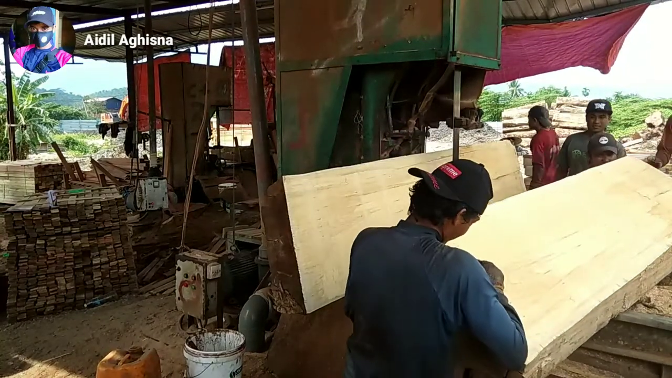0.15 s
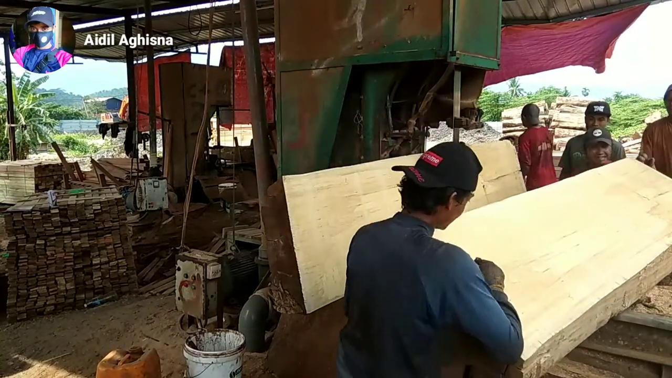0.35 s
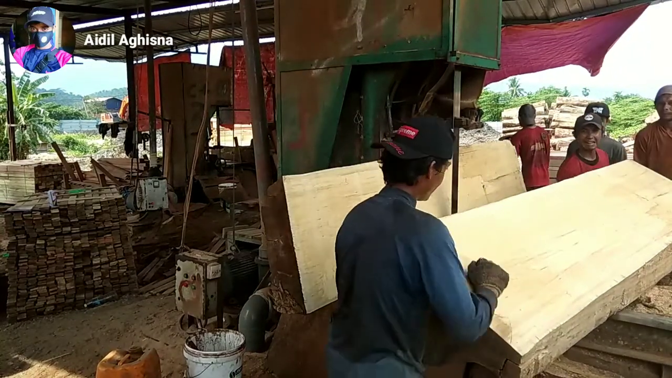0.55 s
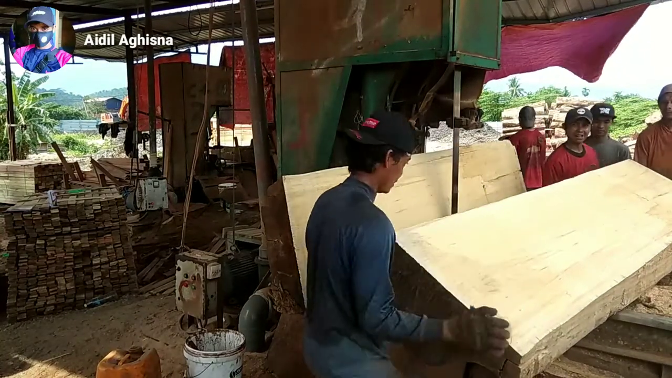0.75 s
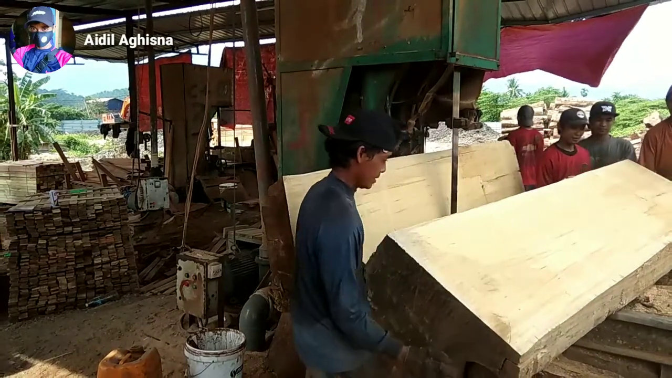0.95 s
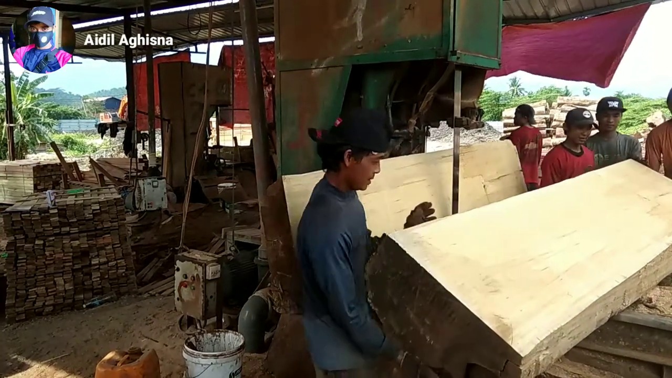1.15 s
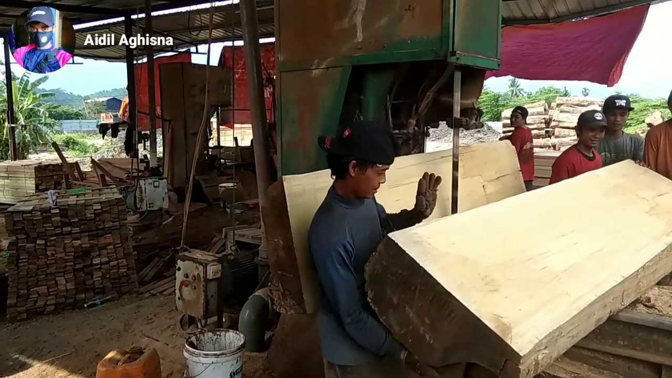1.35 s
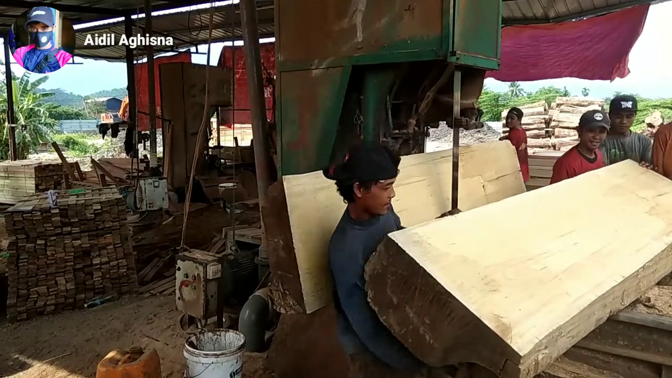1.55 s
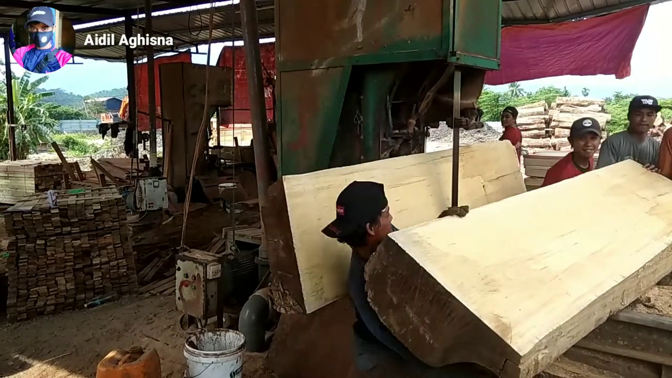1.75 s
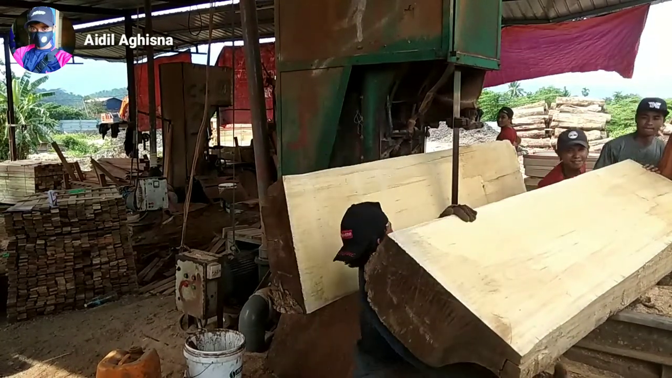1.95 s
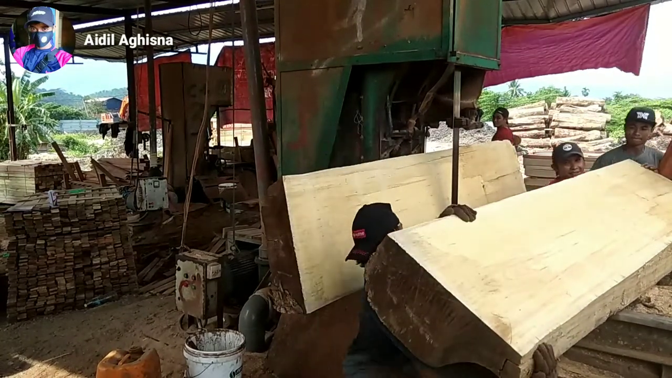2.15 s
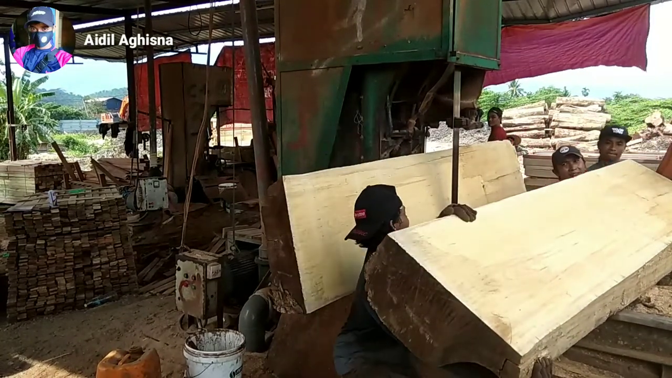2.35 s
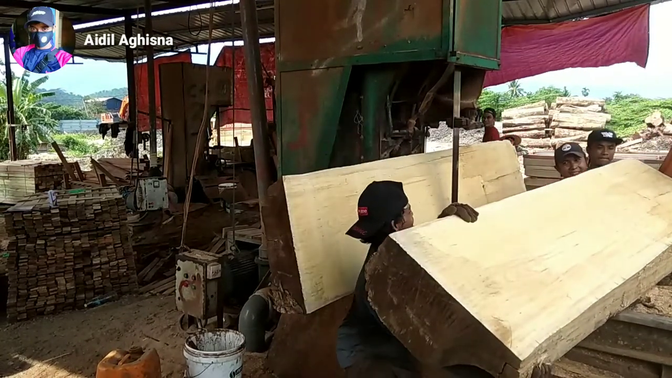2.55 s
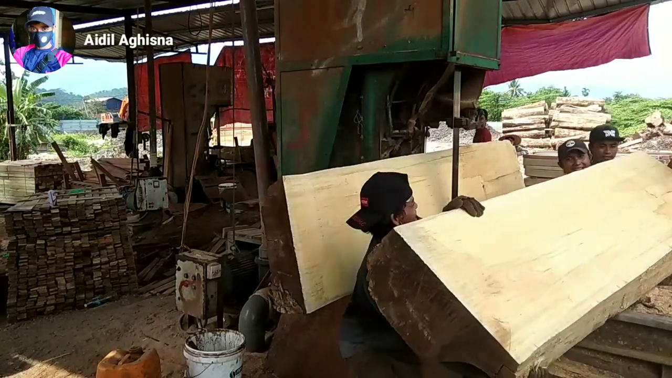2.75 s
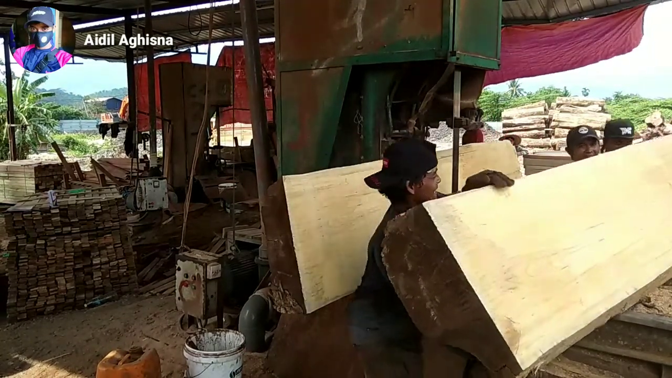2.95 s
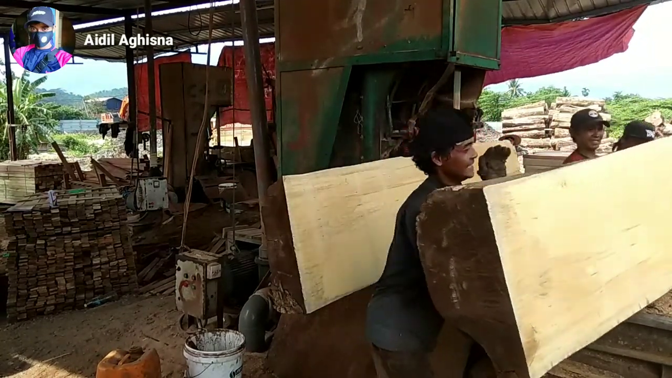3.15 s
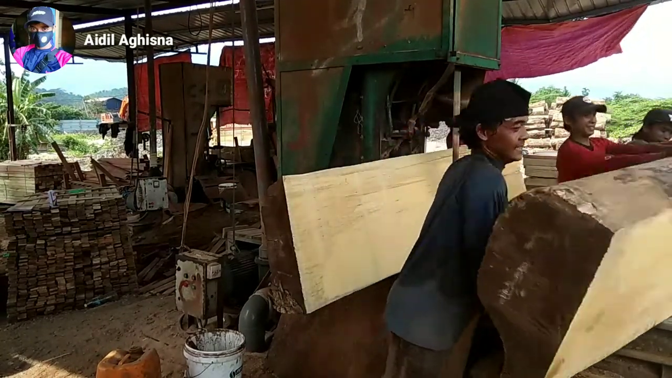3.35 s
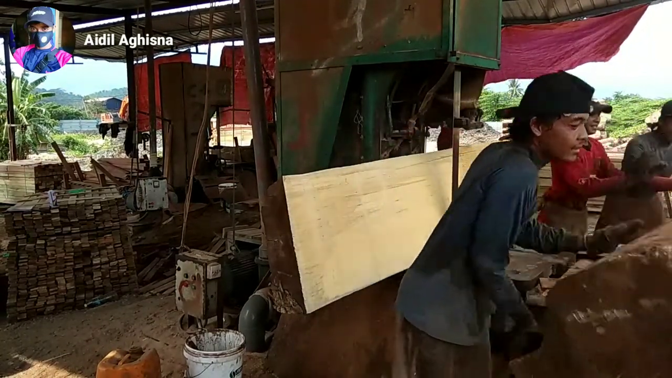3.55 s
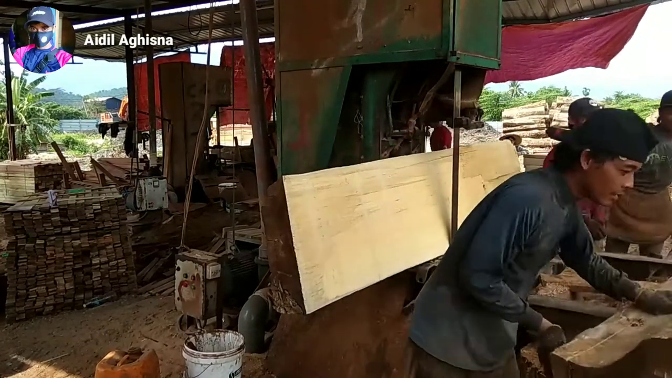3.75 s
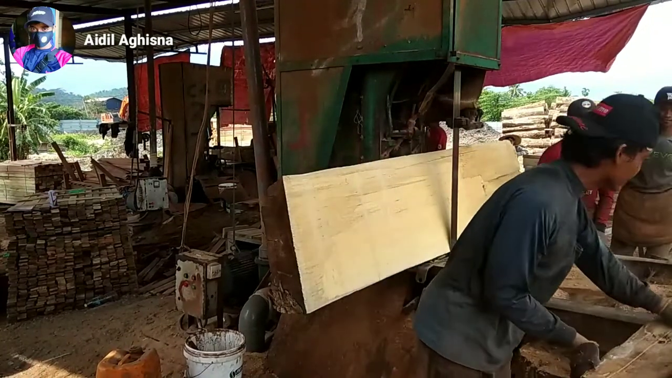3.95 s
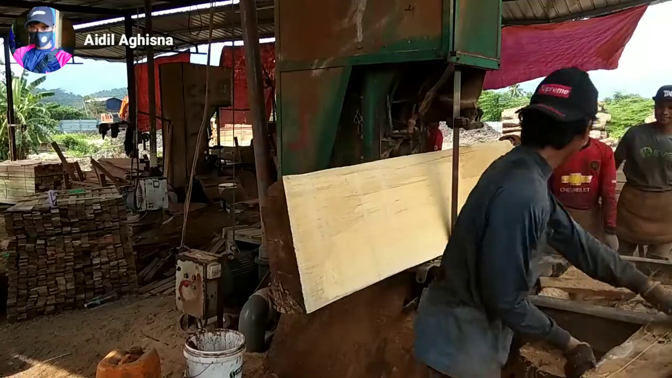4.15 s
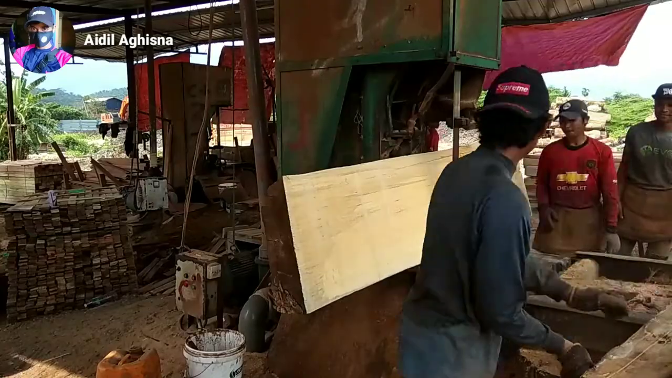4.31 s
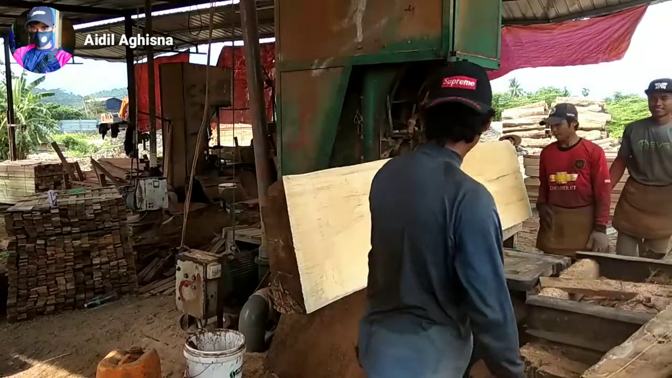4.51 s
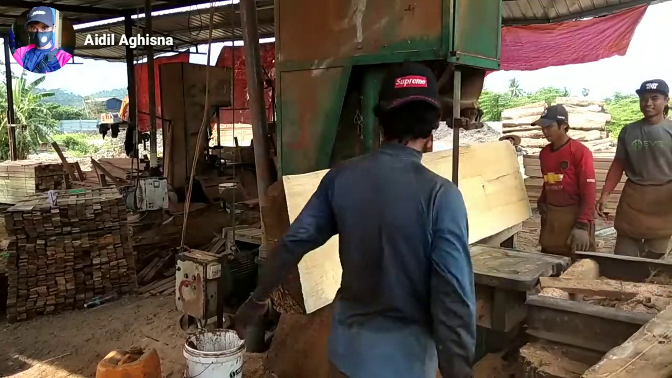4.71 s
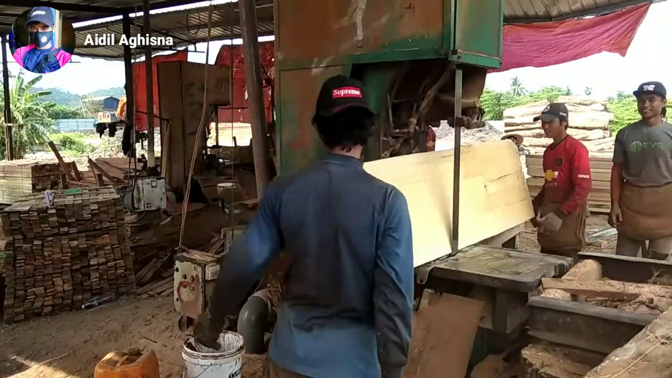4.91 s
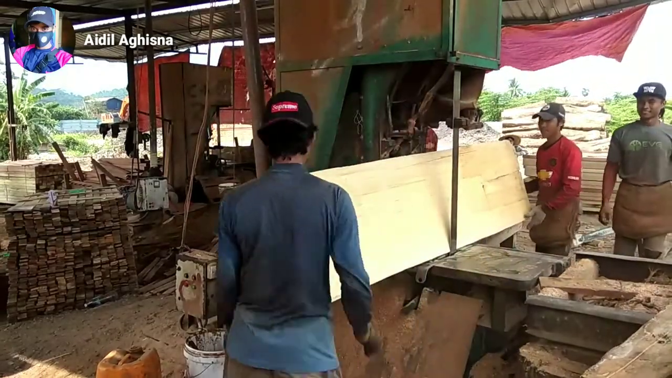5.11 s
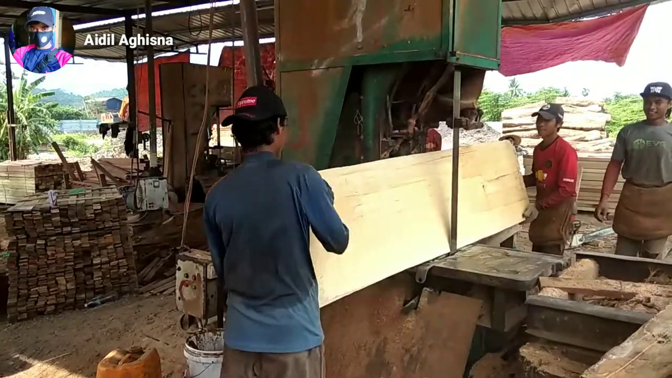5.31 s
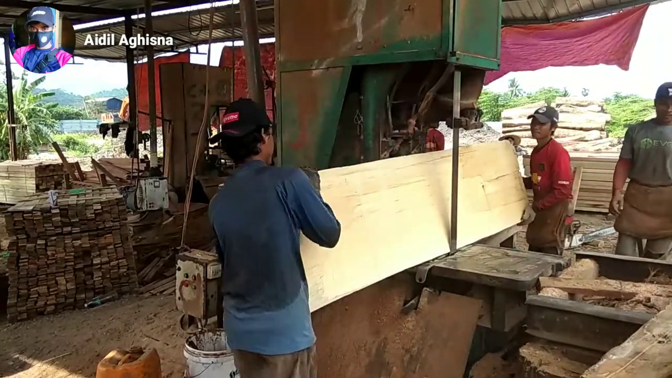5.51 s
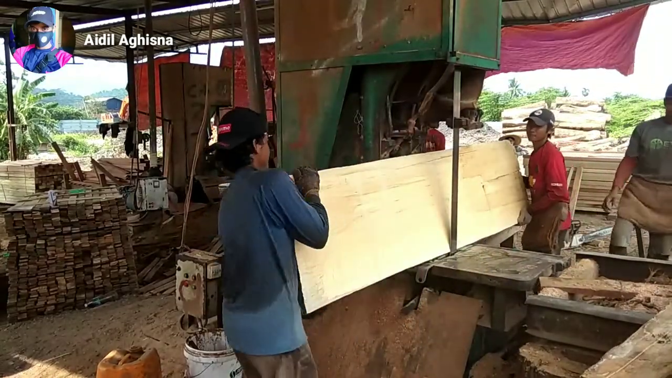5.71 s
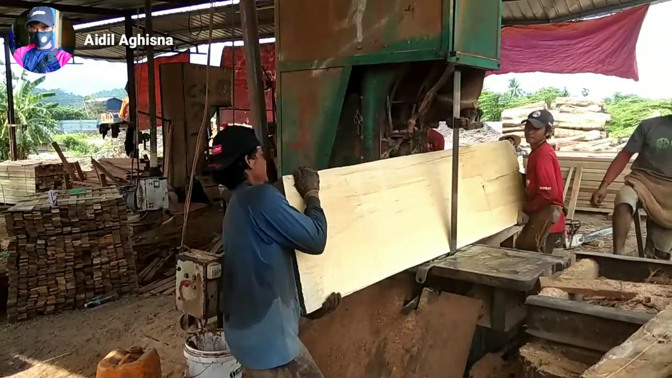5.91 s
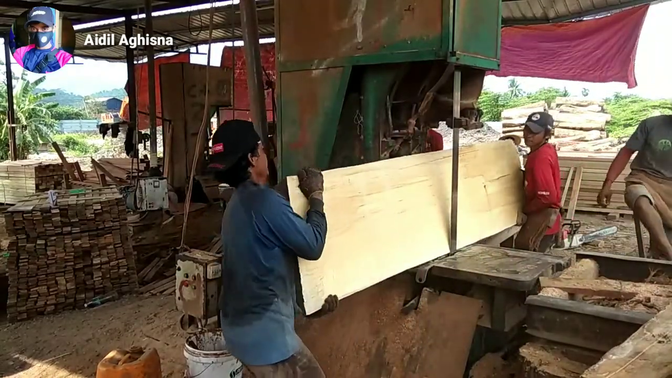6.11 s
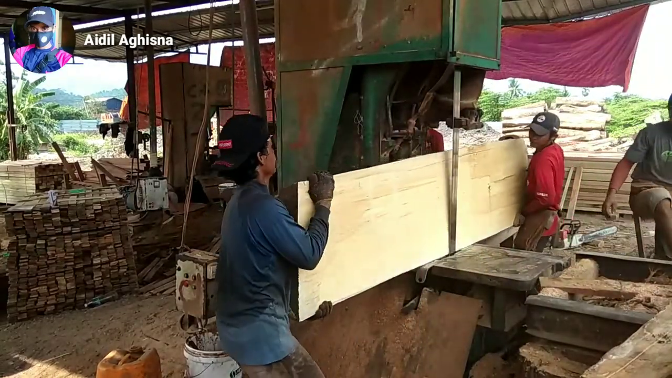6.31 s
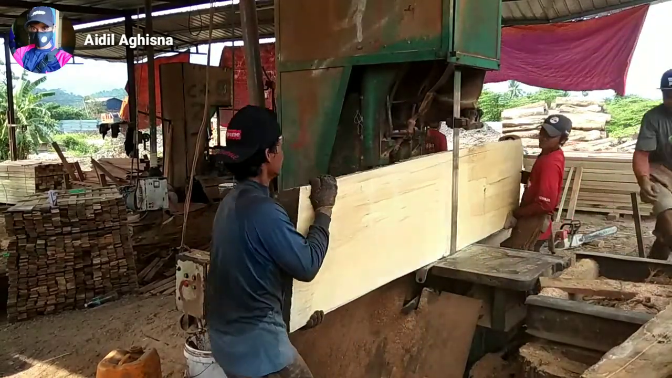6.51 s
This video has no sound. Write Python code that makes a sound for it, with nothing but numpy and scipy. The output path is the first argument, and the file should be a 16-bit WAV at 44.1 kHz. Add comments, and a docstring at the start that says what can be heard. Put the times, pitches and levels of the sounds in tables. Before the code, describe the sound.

A band saw idles with a steady whine and hiss, and a thick wooden slab groans and lands with a dull thud.

```python
"""A steady whine and rush fill an open sawmill shed: a band saw is idling. Its motor sings one note over
the noise of belt, wheels and blade, and steel parts chink faintly. About three seconds in, a thick slab is
tipped and groans twice as wood sticks and slips on wood. It lands on the timber bed with a dull thud,
and the shed roof echoes. At the very end the motor picks up speed."""
import sys
import numpy as np
from scipy import signal
from scipy.fft import rfft, irfft, next_fast_len
from scipy.io import wavfile
from scipy.ndimage import uniform_filter1d, minimum_filter1d, map_coordinates

SR = 44100
rng = np.random.default_rng(int(sys.argv[2]) if len(sys.argv) > 2 else 0)


def wav_out(sig):
    """Save sig, one row per channel (or a flat mono array), as 16-bit PCM at SR to the path in sys.argv[1]."""
    wavfile.write(sys.argv[1], SR, np.round(np.clip(np.atleast_2d(sig).T, -1, 1) * 32767).astype(np.int16))


N = 289737

# The motor's whine, louder when the slab and the workers stop blocking it: (time [s], level [dB])
WHINE_LEVELS = [(0, -64.5), (1.01, -65.5), (1.13, -68), (2.85, -68), (3.29, -60.5), (3.77, -61),
                (4.12, -58.5), (4.76, -59.5), (5.03, -63), (6.35, -60.5), (6.57, -64)]
# The low, middle and high parts of the saw's rush: (frequency [Hz], relative level [dB])
RUMBLE_SHAPE = [(12, -33), (20, 1), (70, 4.5), (161, -10), (195, -5.5), (387, -8.5), (412, -13), (447, -19),
                (507, -11.5), (900, -9), (1170, -38), (1980, -120)]
BODY_SHAPE = [(500, -7.5), (850, -9), (882, -26), (1020, 0), (1160, -4), (1690, -8), (1840, -6),
              (2530, -7.5), (2870, -8.5), (3130, -6.5), (5000, -14), (6500, -73), (11000, -120)]
HISS_SHAPE = [(2820, -55), (4800, -62), (5020, -8.5), (5450, -5), (6570, -7.5), (7840, -4), (8480, -5),
              (9870, 3), (11100, 4), (12000, 2.5), (14900, -5.5), (15500, -15)]
# Where the saw's housing and blade guides ring: (frequency [Hz], width [Hz], relative level [dB])
HOUSING_PEAKS = [(79, 11, -2), (191.6, 6.5, -1.5), (970, 9, -13), (1045, 25, -0.5), (1135, 24, 1),
                 (1256, 17, -0.5), (1287, 14, 0.5), (1437, 37, -2.5), (2825, 100, -9)]
GUIDE_PEAKS = [(5400, 260, -14), (7990, 200, -8), (10180, 290, -3), (11500, 250, -9), (12200, 450, -4),
               (13300, 250, -6), (13700, 200, -11), (14750, 200, -5)]
# How alike the rush is in both ears: (frequency [Hz], likeness [-1 opposite to 1 the same])
EAR_LIKENESS = [(60, -0.21), (120, 0.38), (240, 0.74), (480, 0.13), (950, 0.62), (1890, 0.36), (3770, 0.18),
                (7520, -0.31), (10500, 0.61), (13000, -0.47), (15000, -0.099)]
# Which side the rush leans to: (frequency [Hz], left minus right [dB])
RUSH_BALANCE = [(60, 0), (150, 0), (380, -0.5), (950, 1), (2380, 0), (5980, 0.5), (15000, 0.0)]
# Faint tones of shafts and bearings: (pitch [Hz], typical level [dB])
BEARING_TONES = [(928, -87), (1023, -82.5), (1195, -78.5), (1421, -85.5), (1533, -89), (1603, -80),
                 (1786, -84), (2026, -85), (2236, -88.5), (2290, -91), (2768, -80), (2995, -79.5),
                 (3180, -101)]
# Steel chinks; a ring time is how long a sound takes to fade by 60 dB:
# (time [s], pitch [Hz], level [dB], ring time [s], left minus right [dB])
STEEL_CHINKS = [(1.078, 12050, -42, .3, 0), (2.33, 4780, -65, 0.96, 0), (2.405, 12300, -44, .12, 0),
                (3.705, 14540, -49, 0.34, 0), (4.07, 10140, -45, 0.15, 0), (4.12, 13750, -53, .15, 0),
                (4.187, 13700, -51, .4, -2), (4.255, 13650, -52, 0.2, -3), (4.475, 11040, -47, .15, 0),
                (4.548, 7670, -51.5, .35, 0), (4.628, 7980, -53, 0.18, 0), (4.648, 7990, -44.5, 0.43, 0),
                (4.768, 6800, -56, .15, 0), (4.92, 12650, -48, .2, 0), (5.07, 13150, -49, .15, 0),
                (5.105, 13600, -52, .2, 0), (5.15, 14250, -47, .4, -3), (5.25, 14650, -47, .4, -6),
                (5.297, 14680, -51, .5, -3), (5.795, 14642, -45, 0.5, -4), (5.812, 12400, -47, .15, 0),
                (6, 2360, -61, 0.18, 0), (6.422, 13150, -43, .25, 0), (6.48, 10290, -38, 0.4, 0),
                (6.503, 10290, -43, .3, 0), (6.535, 10290, -45, .5, 2)]
# The slab rubs on its edge, judders after the first loud groan and skids as it lands: (start [s],
# length [s], swell [s], first pitch [Hz], glide [Hz/s], level [dB], fade [dB/s], left minus right [dB])
SLAB_RUBS = [(2.995, 0.027, 0.0067, 528, -940, -51, 0, 5), (3.063, 0.03, .01, 545, 0, -58, 60, 2),
             (3.424, 0.055, 0.0096, 655, -940, -30, 0, 2.5), (3.491, 0.026, 0.0024, 610, 900, -41.5, 0, 6),
             (3.521, 0.013, 0.0022, 650, 0, -44.5, 0, 0), (3.537, 0.0069, 0.0022, 617, 0, -47, 0, 0),
             (3.563, 0.026, 0.0037, 611, -300, -46, 60, 0), (3.592, 0.013, 0.0018, 660, 400, -45.5, 100, 4),
             (3.627, 0.0097, 0.0028, 640, 0, -51, 0, -4), (3.664, 0.031, .004, 657, 4, -57, 0, -6),
             (3.793, 0.061, 0.003, 612, -1400, -26.5, 115, 5),
             (3.8, 0.067, 0.0025, 616.3, 2300, -31.5, 27, -5)]
# How long the shed echoes: (frequency [Hz], ring time [s])
ECHO_TIMES = [(60, 0.74), (130, 0.41), (300, 0.48), (600, 0.74), (800, 0.77)]
# Knocks as the slab lands and settles: (time [s], strength [dB], favoured pitch [Hz], rise time [s])
SLAB_KNOCKS = [(3.799, -18, 283, 0.0028), (3.807, -7, 143.4, 0.0054), (3.812, -18.5, 664, 0.0049),
               (3.84, -24, 535, 0.0026), (3.906, -33.5, 636, 0.0024)]
# Natural notes of slab and bed: (pitch [Hz], level [dB], ring time rocking [s], ring time lying flat [s])
SLAB_NOTES = [(106.5, -4, 1, 0.4), (130.3, 4.5, 0.24, 0.11), (155.8, 7.5, 0.13, 0.15),
              (186.7, -9.5, 0.69, 0.49), (228, -14, 0.19, .1), (253, 2.5, 0.4, 0.17),
              (327.2, 7.5, 0.224, 0.28), (421, 1, 0.51, 0.71), (428, -17, 0.18, 0.091),
              (503, -2, 0.41, 0.084), (550, 5, 0.16, 0.026), (609, 1, 0.3, 0.059), (669, 1, 0.5, 0.083),
              (750, -5.5, 0.65, 0.086)]
# The shudder of the bed timbers: (frequency [Hz], relative level [dB])
SHUDDER_SHAPE = [(30, -19), (82, -25), (110, 7.5), (170, -1), (330, -2.5), (460, -14), (600, -13),
                 (760, -25), (900, -29), (1200, -120)]


def amp(db):
    """Turn decibels into a factor to multiply by."""
    return 10 ** (np.asarray(db) / 20)


def unit(x):
    """Scale a signal to an average power of 1."""
    return x / np.sqrt(np.mean(x ** 2) + 1e-20)


def along(points, hz):
    """Read between the rows of a (frequency, value) table, with octaves evenly spaced."""
    freqs, values = np.transpose(points)
    return np.interp(np.log(hz + 1), np.log(freqs + 1), values)


def wobble(rate):
    """A smooth random curve through `rate` new values a second."""
    return map_coordinates(rng.standard_normal(int(N * rate / SR) + 4), [np.arange(N) * rate / SR])


def filtered(x, response):
    """Multiply each frequency in x by response(frequency)."""
    size = next_fast_len(N + SR // 2)
    return irfft(rfft(x, size) * response(np.fft.rfftfreq(size, 1 / SR)), size)[..., :N]


def sides(db):
    """Left and right gains that make the left ear `db` louder."""
    return amp(np.multiply.outer([.5, -.5], db))


def motor(pitch_hz=418.4, speedup_at_s=6.37, speedup_hz_per_s=55, centred_db=-56):
    """The motor sings a clean note and a weaker, unsteady octave. The note leans right when blocked."""
    t = np.arange(N) / SR
    db = np.interp(t, *np.transpose(WHINE_LEVELS))
    hz = pitch_hz + speedup_hz_per_s * np.maximum(t - speedup_at_s, 0)
    phase = 2 * np.pi * np.cumsum(hz + 0.32 * wobble(6.24)) / SR
    wander_db = .8 * wobble(3) + .9 * wobble(12)
    note = amp(db + wander_db) * np.sin(phase) * sides(.5 * (db - centred_db))
    octave = amp(-77.5 + 3.5 * wobble(7)) * np.sin(2 * phase + .9 * wobble(15))
    return np.sqrt(2) * (note + octave)


def resonances(peaks):
    """A gain curve for a part that rings at several pitches; the peaks' powers add up."""
    return lambda hz: np.sqrt(sum(amp(2 * db) * width ** 2 / (width ** 2 + 4 * (hz - centre) ** 2)
                                  for centre, width, db in peaks))


def rush(gain, patchy_db):
    """Stereo noise shaped by a gain curve, with random louder and softer patches in pitch and time."""
    spectrum = signal.stft(rng.standard_normal((2, N + 512)), nperseg=512)[2]
    patches = uniform_filter1d(rng.standard_normal(spectrum.shape[1:]), size=2, axis=0)
    patches = uniform_filter1d(patches, size=10, axis=1)
    noise = signal.istft(spectrum * amp(patchy_db * unit(patches)), nperseg=512)[1][:, :N]
    spread = lambda hz: np.arccos(np.clip(along(EAR_LIKENESS, hz), -1, 1)) / 2
    shared, apart = filtered(noise, lambda hz: gain(hz) * [np.cos(spread(hz)), np.sin(spread(hz))])
    return unit(np.array([shared + apart, shared - apart]))


def saw():
    """Wheels rumble, the housing rattles, and the blade hisses and sings in its guides."""
    shape = lambda table: lambda hz: amp(along(table, hz))
    rumble = amp(-63 + 0.74 * wobble(2.66)) * rush(shape(RUMBLE_SHAPE), patchy_db=0.4)
    body = amp(-59.5 + 0.42 * wobble(3.4)) * rush(shape(BODY_SHAPE), patchy_db=2)
    rattle = amp(-65) * rush(resonances(HOUSING_PEAKS), patchy_db=-1)
    sizzle_db = .1 * wobble(4) + .4 * wobble(14) + .3 * wobble(30)
    blade = amp(-51 + sizzle_db) * rush(shape(HISS_SHAPE), patchy_db=1.8)
    guides = amp(-55 + sizzle_db) * rush(resonances(GUIDE_PEAKS), patchy_db=2.1)
    return filtered(rumble + body + rattle + blade + guides, lambda hz: sides(along(RUSH_BALANCE, hz)))


def bearings(drifts_per_s=14):
    """Shafts and bearings hum faint tones, each wavering on its own."""
    hz, db = np.transpose(BEARING_TONES)[..., None]
    steps = np.arange(N) * drifts_per_s / SR

    def drift():
        targets = rng.standard_normal((len(hz), int(steps[-1]) + 2))
        return np.array([np.interp(steps, np.arange(len(row)), row) for row in targets])

    tones = amp(db + 2.9 * drift()) * np.sin(2 * np.pi * hz * np.arange(N) / SR + 1.24 * drift())
    return np.sqrt(2) * sides(rng.normal(0, 2, len(hz))) @ tones


def chinks(faint_count=5, blur_s=.012):
    """Struck steel rings on one note: clean at first, then fluttering as the shed's echoes blur it."""
    out, t = np.zeros((2, N + SR)), np.arange(SR // 2) / SR
    flutter, jitter = (np.pad([wobble(110), wobble(110)], [(0, 0), (0, SR)]) for _ in range(2))
    # a few extra faint chinks at random times and pitches
    faint = [(when * N / SR, 9000 + 6000 * high, -50, 0.3, 0)
             for when, high in rng.random((faint_count, 2))]
    blur = 1 - np.exp(-(t / blur_s) ** 2)
    for start, hz, db, ring_s, lean_db in STEEL_CHINKS + faint:
        span = slice(round(start * SR), round(start * SR) + len(t))
        strike = 0.8 * amp(-60 * t / 0.07)
        envelope = (strike + amp(-60 * t / ring_s)) * (1 - np.exp(-t / 0.003))
        level = amp(db + 2.5 * blur * flutter[:, span])
        tone = np.sin(2 * np.pi * hz * t + blur * jitter[:, span])
        out[:, span] += sides(lean_db)[:, None] * level * envelope * tone
    return out[:, :N]


def groans(swell_db=24.5, release_db_per_s=1500):
    """Wood sticks and slips on wood: each rub is a gliding, gritty tone that swells and breaks off."""
    out = np.zeros((2, N))
    grit = 1 + 0.12 * wobble(120)
    for start, length, swell_s, hz, glide, level_db, fade, lean_db in SLAB_RUBS:
        t = np.maximum(np.arange(N) / SR - start, 0)
        db = level_db - fade * t - swell_db * np.exp(-t / swell_s)
        db -= release_db_per_s * np.maximum(t - length, 0)
        tone = np.sin(2 * np.pi * (hz * t + glide * t * t / 2))
        out += np.sqrt(2) * amp(db) * tone * sides(lean_db)[:, None]
    return out * grit


def shed_echo(x, rise_s=0.0033):
    """The roof's echo swells, then each frequency fades at its own speed. The ears share more bass."""
    hz, t, spectrum = signal.stft(rng.standard_normal((2, SR)), SR, nperseg=1024)
    width = np.clip(hz / 500, .35, .95)[:, None]
    fade = amp(-60 * t / along(ECHO_TIMES, hz)[:, None])
    tail = signal.istft(spectrum * [np.ones_like(width), width] * fade, SR, nperseg=1024)[1]
    shared, apart = tail * (1 - np.exp(-np.arange(tail.shape[1]) / SR / rise_s))
    echo = [shared + apart, shared - apart] / np.linalg.norm(shared)
    return signal.fftconvolve(x.mean(axis=0)[None], echo, axes=1)[:, :N]


def thud(flat_at_s=3.856, right_late_s=0.0003):
    """Each knock rings the wood's notes near its favoured pitch. Lying flat on the bed damps most."""
    out, t = np.zeros((2, N + SR)), np.arange(SR // 2) / SR
    hz, db, rocking_ring_s, flat_ring_s = np.transpose(SLAB_NOTES)[..., None]
    for start, strength_db, favoured_hz, rise_s in SLAB_KNOCKS:
        octaves_away = np.log2(hz / favoured_hz)
        mismatch_db = np.maximum(-60 * octaves_away ** 2, -45)
        rocking_s = np.minimum(t, max(flat_at_s - start, 0))
        fade_db = -60 * (rocking_s / rocking_ring_s + (t - rocking_s) / flat_ring_s)
        envelope = amp(strength_db + db + mismatch_db + fade_db) * (1 - np.exp(-t / rise_s)) ** 2
        for ear, lag in enumerate([0, right_late_s]):
            notes = envelope * np.sin(2 * np.pi * hz * (t - lag))
            out[ear, round(start * SR):][:len(t)] += notes.sum(axis=0)
    return out[:, :N]


def shudder(rise_s=0.0039):
    """The heaviest knock shakes the loose bed: too many notes to tell apart, so a dying roar."""
    start = SLAB_KNOCKS[1][0]
    push = np.zeros((1, N))
    push[0, round(start * SR)] = 1
    roar = filtered(shed_echo(push), lambda hz: amp(along(SHUDDER_SHAPE, hz)))
    t = np.maximum(np.arange(N) / SR - start, 0)
    rise = 1 - np.exp(-(t / rise_s) ** 2)
    return roar * rise / np.linalg.norm(roar[0])


def scene(echo_db=-15, shudder_db=10.5, wood_top_hz=797):
    """Mix the saw and the slab. Freshly cut timber passes nothing bright, so slab and echo are dull."""
    rub, fall = groans(), thud()
    scattered = rub * (1 + 1.27 * wobble(110))  # the slab's rough underside faces the roof
    echoes = amp(echo_db) * (shed_echo(scattered) + shed_echo(fall))
    wood = rub + fall + echoes + amp(shudder_db) * shudder()
    dull_wood = signal.sosfilt(signal.butter(8, wood_top_hz, fs=SR, output="sos"), wood)
    return dull_wood + motor() + bearings() + saw() + chinks()


def record(dry, top_hz=15550, right_late_s=.00003):
    """A limiter briefly turns loud moments down. The top treble is cut; the right ear lags a touch."""
    peak_db = 20 * np.log10(np.abs(dry).max(axis=0) + 1e-9)
    needed_db = np.minimum(0, -.27 * (peak_db + 17))  # acts above -17 dB
    held_db = minimum_filter1d(needed_db, size=1000, origin=150)
    limited = dry * amp(uniform_filter1d(held_db, size=700))
    delay = lambda hz: np.exp(-2j * np.pi * np.outer([0, right_late_s], hz))
    return filtered(limited, lambda hz: (hz < top_hz) * delay(hz))


dry = scene()
out = record(dry)
wav_out(out)
```